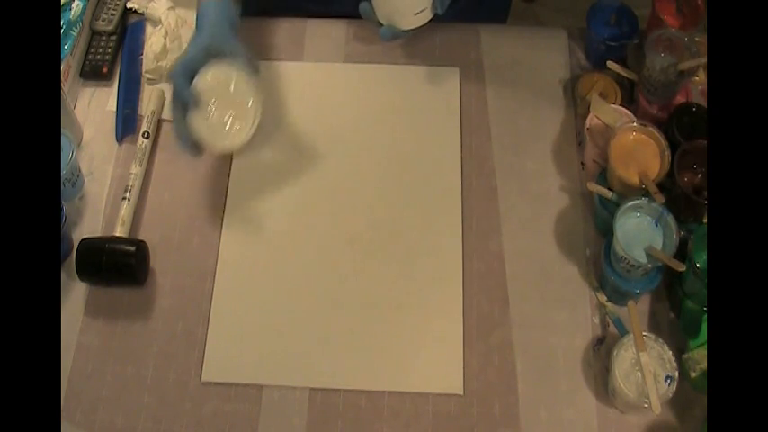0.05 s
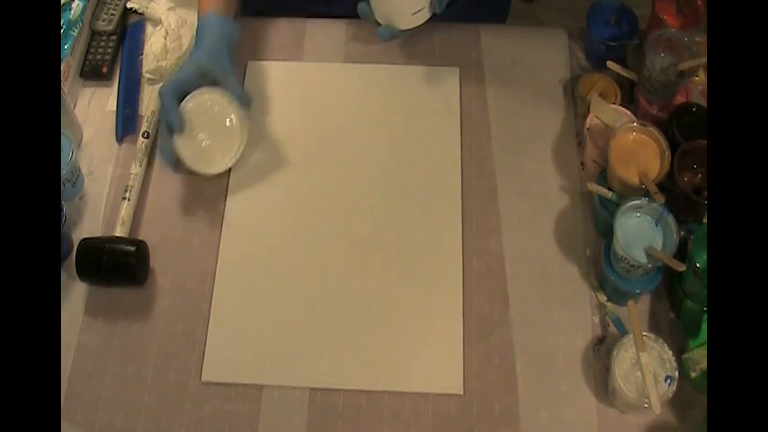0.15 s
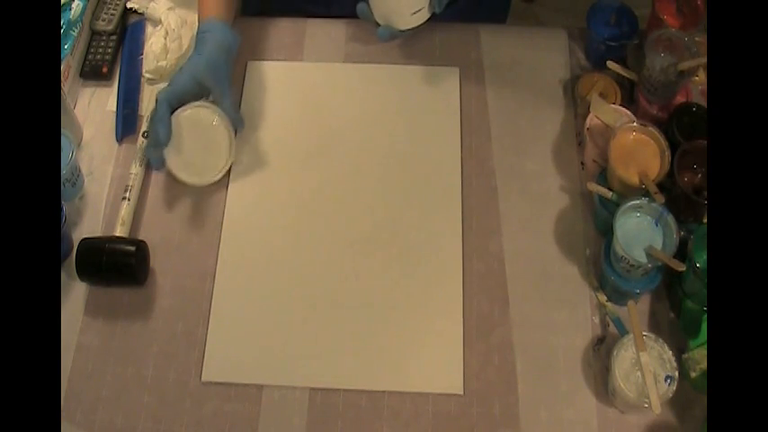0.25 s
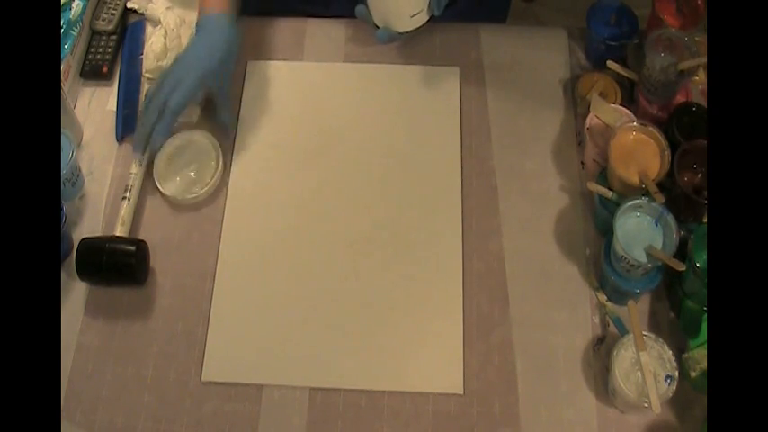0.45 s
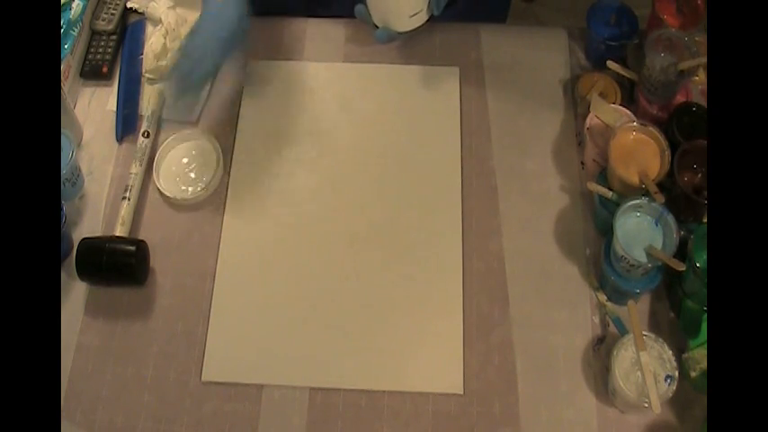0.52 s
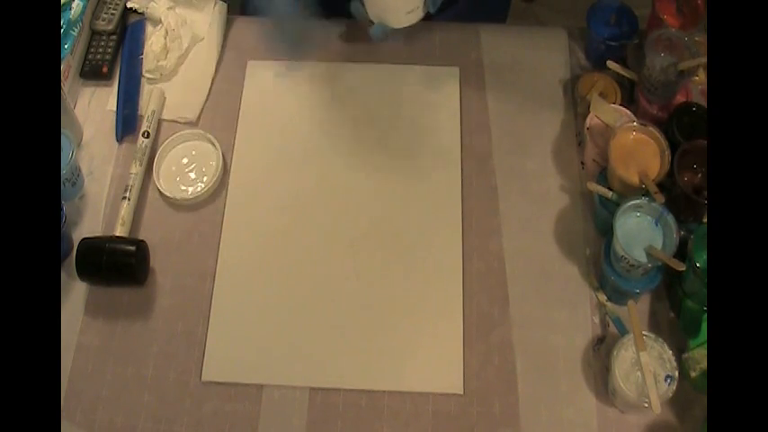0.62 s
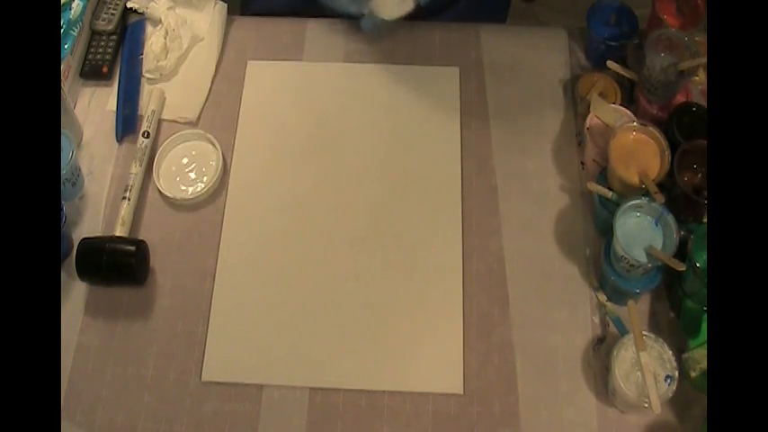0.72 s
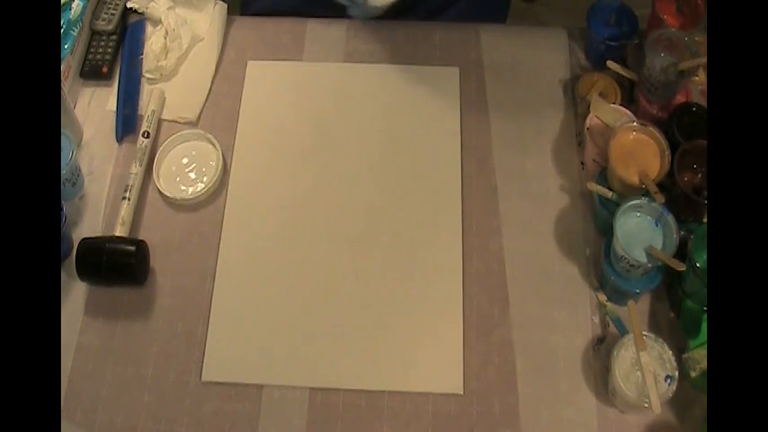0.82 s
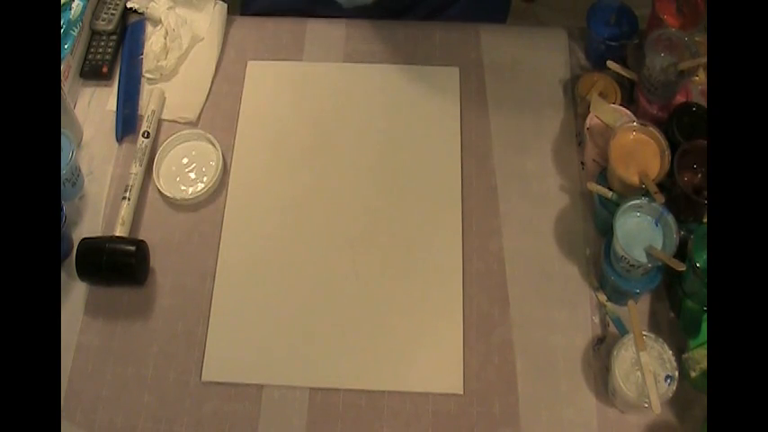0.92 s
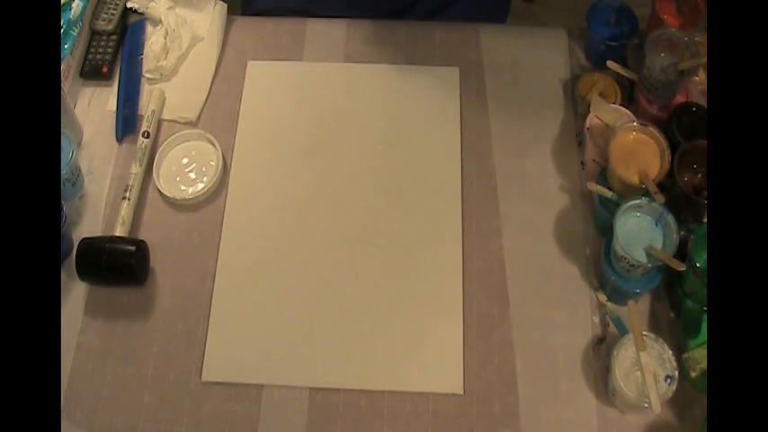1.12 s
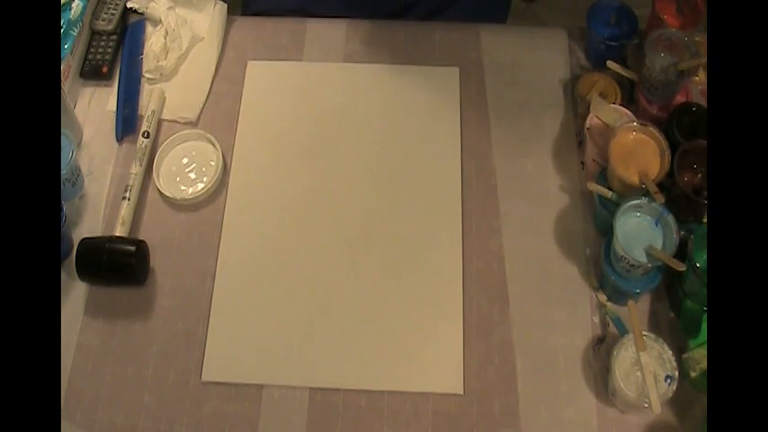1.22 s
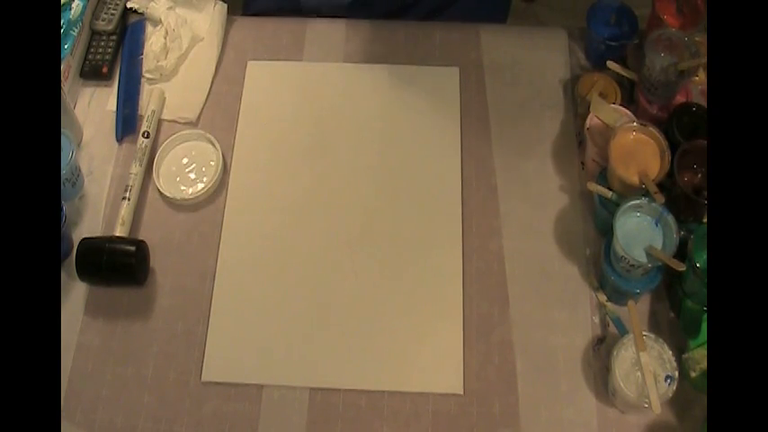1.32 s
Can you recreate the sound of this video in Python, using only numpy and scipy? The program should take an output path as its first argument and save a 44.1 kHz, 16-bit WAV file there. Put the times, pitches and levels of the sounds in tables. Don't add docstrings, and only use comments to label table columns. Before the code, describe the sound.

Plastic lid clicks onto a tabletop, rocks briefly and drops flat with a crisp clack indoors.

```python
import sys
import numpy as np
from scipy import signal
from scipy.io import wavfile

SR = 44100
rng = np.random.default_rng(int(sys.argv[2]) if len(sys.argv) > 2 else 0)


def level_to_linear(level):
    exponent = np.asarray(level, float) / 20
    return 10 ** exponent


def store_pcm(level_fs):
    pcm = np.round(np.clip(level_fs, -1, 1) * 32767).astype(np.int16)
    wavfile.write(sys.argv[1], SR, np.atleast_2d(pcm).T)


N = 59535

# [Hz, brightness]
EDGE_TOUCHES = [
    (0.2188, -10.5, 3160),
    (0.2202, -21.5, 2970),
    (0.2236, -33, 1490),
    (0.2305, -40, 1500),
    (0.2400, -22.5, 1500),
    (0.2996, -38, 2500),
]
# [Hz, brightness]
FLAT_TOUCHES = [
    (0.3899, -4, 9600),
    (0.3917, -6, 1360),
    (0.3942, -11.5, 6900),
    (0.3973, -21.5, 1980),
]
# pitch_hz [Hz], level_db [dB], t60_s [s]
EDGE_MODES = [(423, 5.5, 0.055), (584, -9.5, 0.011), (690, 0, 0.02), (840, -3, 0.046), (1104, -3, 0.0157),
              (1565, 4, 0.011), (1984, 6, 0.0052), (2500, -13.5, 0.0035), (2900, -9, 0.0033),
              (3970, -9, 0.0019)]
# pitch_hz [Hz], level_db [dB], t60_s [s]
FLAT_MODES = [(398, -2.5, 0.098), (646, 0, 0.036), (834, -2.5, 0.049), (1060, 0.5, 0.013), (1480, -3, .01),
              (1810, 2.5, 0.0098), (2150, 3.5, .01), (2840, -8.5, 0.012), (3200, 4.5, 0.0025),
              (4200, -16, 0.0012), (5000, -11, 0.0011), (6100, -9, 0.0018), (7250, -33, 0.0016)]


def at_hz(points, hz):
    points = np.array(points)
    return np.interp(np.log(hz), np.log(points[:, 0]), points[:, 1])


def rms_one(x):
    return x / np.sqrt(np.mean(x ** 2) + 1e-20)


def butter(x, order, hz, kind):
    return signal.sosfilt(signal.butter(order, hz, kind, fs=SR, output="sos"), x)


def click_at(start_s, level_db):
    click = np.full(N, 1e-18)
    click[int(start_s * SR)] = level_to_linear(level_db)
    return click


def drift(rate_hz):
    pole = np.exp(-80 * np.pi * rate_hz / SR)
    noise = rng.standard_normal(N // 40 + 2002)
    slow = signal.lfilter([1], [1, -2 * pole, pole * pole], noise)[2000:]
    return np.interp(np.arange(N) / 40, np.arange(len(slow)), rms_one(slow))


def ring(clicks, pitch_hz, t60_s):
    pole = level_to_linear(-60 / (t60_s * SR))
    turn = 2 * np.pi * pitch_hz / SR
    return signal.lfilter([0, np.sin(turn)], [1, -2 * pole * np.cos(turn), pole * pole], clicks + 1e-18)


def bands(gain_db, likeness):
    out = 0
    edges = 25 * 2 ** np.arange(0, 9.6, .5)
    white = rng.standard_normal((2, 2, N + 4000))
    for k, (low, high) in enumerate(zip(edges, edges[1:])):
        mid, side = butter(white[k % 2], 2, [low, high], "band")[:, 4000:]
        hz = np.sqrt(low * high)
        alike = np.clip(at_hz(likeness, hz), -1, 1)
        stereo = np.sqrt(1 + alike) * mid + np.sqrt(1 - alike) * side * [[1], [-1]]
        out = out + level_to_linear(gain_db(hz)) * stereo
    return out


def room_hum():
    # pitch_hz [Hz], level_db [dB per Hz]
    spectrum = [(15, -50), (25, -14.5), (134, -8), (236, -2.5), (734, -9.5), (1480, -14.5), (2110, -22.5),
                (2840, -20.5), (16000, -40.5)]
    # pitch_hz [Hz], likeness [-1 to 1]
    likeness = [(60, -0.59), (130, -0.58), (290, 0.26), (1400, -0.14), (15000, -0.2)]
    level_db, sway_db, flicker_db = -51.5, .6, 1.3
    sway = sway_db * drift(4.4)
    bed = bands(lambda hz: at_hz(spectrum, hz) + sway + flicker_db * drift(6.6), likeness)
    return level_to_linear(level_db) * rms_one(bed)


def glove_taps():
    # start_s [s], level_db [dB], pitch_hz [Hz], t60_s [s]
    tap_table = [
        (0.083, -53, 2080, .04),
        (0.775, -50, 3000, .004),
        (0.777, -57, 5800, .025),
        (1.116, -50.5, 2880, 0.0044),
        (1.123, -53, 3300, .005),
        (1.202, -52.5, 3130, 0.017),
        (1.262, -54.5, 1978, 0.09),
        (1.265, -58, 6840, .03),
        (0.91, -60, 9070, 0.022),
    ]
    return sum(ring(click_at(start_s, level_db), pitch_hz, t60_s)
               for start_s, level_db, pitch_hz, t60_s in tap_table)


def rubbing(gestures, spectrum, alike, grain_db, flicker_db):
    t = np.arange(N) / SR
    stroke = np.zeros(N)
    for start_s, rise_s, hold_s, fall_s, level_db in gestures:
        corners = np.cumsum([start_s, rise_s, hold_s, fall_s])
        stroke += level_to_linear(level_db) * np.interp(t, corners, [0, 1, 1, 0])
    grain = grain_db * drift(133)

    def gain_db(hz):
        low_cut_db = 24 * max(0, np.log2(spectrum[0][0] / hz))
        return at_hz(spectrum, hz) - low_cut_db + grain + flicker_db * drift(5)

    return stroke * rms_one(bands(gain_db, [(20, alike)]))


def edge_slide():
    # start_s [s], rise_s [s], hold_s [s], fall_s [s], level_db [dB]
    gestures = [
        (0.215, 0.041, 0.038, 0.17, -52.5),
    ]
    # pitch_hz [Hz], level_db [dB per Hz]
    spectrum = [(500, 6), (1000, 1.5), (2000, 1.5), (4000, -9.5), (5500, -3.5), (8000, -5.5),
                (10500, -23.5), (16000, -18)]
    hiss = rubbing(gestures, spectrum, alike=0.87, grain_db=0.5, flicker_db=0.4)
    return hiss + level_to_linear(-22) * ring(hiss.mean(axis=0), pitch_hz=878, t60_s=0.053)


def strike(touches, modes, ring_share=1):
    # pitch_hz [Hz], level_db [dB], t60_s [s]
    table_modes = [(95.3, -26.5, 0.069), (139, -28.5, 0.15), (183, -20.5, 0.062), (258.4, -16, 0.061)]
    longest_ring_s = .042
    radiates_above_hz = 627
    push = np.zeros(N)
    for start_s, level_db, contact_hz in touches:
        push += butter(click_at(start_s, level_db - 9), 2, contact_hz, "low")
    lid, table = np.zeros(N), np.zeros(N)
    for pitch_hz, level_db, t60_s in modes:
        lid += level_to_linear(level_db) * ring(push, pitch_hz, ring_share * min(t60_s, longest_ring_s))
    for k, (pitch_hz, level_db, t60_s) in enumerate(table_modes):
        table += (-1) ** k * level_to_linear(level_db) * ring(push, pitch_hz, t60_s)
    return butter(lid, 4, radiates_above_hz, "high") + table


def contact_cracks():
    # start_s [s], level_db [dB], rise_s [s], t60_s [s], tilt_db [dB per octave]
    bursts = [
        (0.2190, -38, 0.00094, 0.02, -7),
        (0.3899, -17, 0.0025, .007, 0.5),
        (0.3928, -34, 0.00031, 0.01, 7),
    ]
    # pitch_hz [Hz], level_db [dB per Hz]
    spectrum = [(1500, 13.5), (3000, 9), (6000, 2), (9000, 4.5), (12000, -15), (16000, -9)]
    # pitch_hz [Hz], likeness [0 to 1]
    likeness = [(2000, .95), (5000, 1), (8000, 0.53), (13000, 0)]
    t = np.arange(N) / SR

    def gain_db(hz):
        height = 1e-12
        for start_s, level_db, rise_s, t60_s, tilt_db in bursts:
            since = t - start_s
            fall_db = np.clip(60 * since / t60_s, 0, 300)
            swell = np.clip(1 + since / rise_s, 0, 1) ** 2
            height = height + level_to_linear(level_db + tilt_db * np.log2(hz / 4000) - fall_db) * swell
        low_cut_db = 24 * max(0, np.log2(1500 / hz))
        return at_hz(spectrum, hz) - low_cut_db + 20 * np.log10(height)

    return bands(gain_db, likeness)


def rim_roll():
    roll_s, start_db, end_db = .0038, -30, -23
    drop_s = FLAT_TOUCHES[0][0]
    return [(drop_s - roll_s * (1 - along), start_db + (end_db - start_db) * along + 6 * (uneven - .5), 9000)
            for along, uneven in rng.random((14, 2))]


def glove_rustle():
    # start_s [s], rise_s [s], hold_s [s], fall_s [s], level_db [dB]
    gestures = [
        (0.70, 0.023, 0.096, 0.098, -58.5),
        (0.87, 0.033, 0.063, 0.036, -63),
        (1.105, 0.0038, 0.015, 0.039, -58),
        (1.19, 0.0058, 0.0086, 0.027, -60),
        (1.24, 0.01, .08, .1, -64),
    ]
    # pitch_hz [Hz], level_db [dB per Hz]
    spectrum = [(800, -6), (2000, 3.5), (3500, -0.5), (6000, -7), (9000, -7.5), (12000, -46), (16000, -10)]
    return rubbing(gestures, spectrum, alike=0.81, grain_db=2, flicker_db=0.5)


def towards_walls():
    # start_s [s], level_db [dB], top_hz [Hz]
    snaps = [
        (0.2190, -15, 6040),
        (0.3900, -20.5, 11700),
    ]
    ring_share = .45
    out = strike(EDGE_TOUCHES[:1], EDGE_MODES, ring_share) + strike(FLAT_TOUCHES[:1], FLAT_MODES, ring_share)
    for start_s, level_db, top_hz in snaps:
        out += butter(click_at(start_s, level_db), 2, [1000, top_hz], "band")
    return out


def room(x):
    # pitch_hz [Hz], t60_s [s]
    decay = [(100, 0.51), (400, 0.25), (800, .28), (1500, 0.31), (3000, 0.25), (6000, 0.25), (12000, 0.17)]
    # pitch_hz [Hz], level_db [dB]
    colour = [(100, -10.5), (450, 0.5), (800, -3), (1500, -4), (2500, -5.5), (5000, -1), (12000, 6.5)]
    # pitch_hz [Hz], likeness [0 to 1]
    likeness = [(60, 0.64), (290, 1), (640, 0.97), (1410, 0.91), (3100, 0.63), (6820, 0.26), (15000, 0)]
    level_db, gap_s = -29.5, 0.0045
    t = np.arange(N) / SR
    reply = bands(lambda hz: level_db + at_hz(colour, hz) - 60 * t / at_hz(decay, hz), likeness)
    reply = reply * np.clip(t / gap_s - .5, 0, 1)
    return signal.fftconvolve(x[None], reply, axes=1)[:, :N]


def scene():
    port_lag_s = .00001
    taps = glove_taps()
    edge = strike(EDGE_TOUCHES, EDGE_MODES)
    flat = strike([*FLAT_TOUCHES, *rim_roll()], FLAT_MODES)
    near = edge + flat + taps
    n = np.arange(N)
    direct = np.array([near, np.interp(n - port_lag_s * SR, n, near)]) + contact_cracks()
    reflections = room(towards_walls() + taps)
    return direct + reflections + room_hum() + edge_slide() + glove_rustle()


def band_limit(x):
    return signal.sosfilt(signal.butter(12, 16790, fs=SR, output="sos"), x)


def record(dry):
    rounded = np.tanh(dry)
    cutoff_hz = 16300
    mix = signal.sosfilt(signal.cheby2(12, 70, cutoff_hz, fs=SR, output="sos"), rounded)
    return band_limit(mix)


dry = scene()
out = record(dry)
store_pcm(out)
```